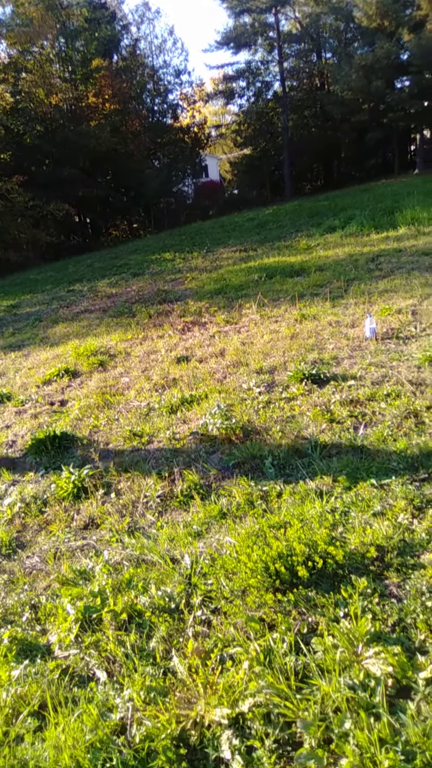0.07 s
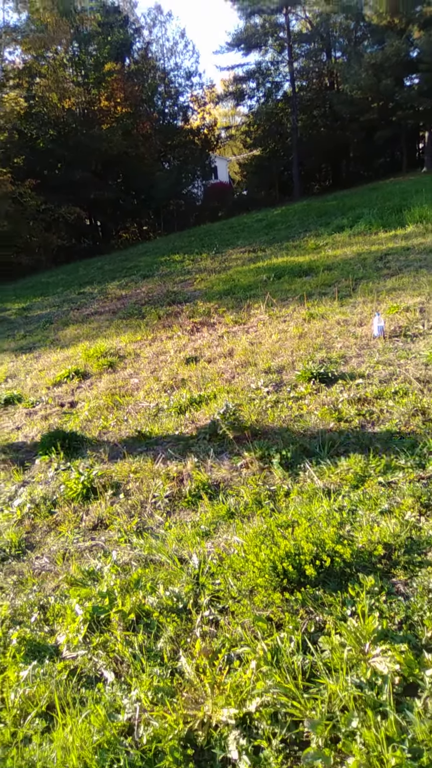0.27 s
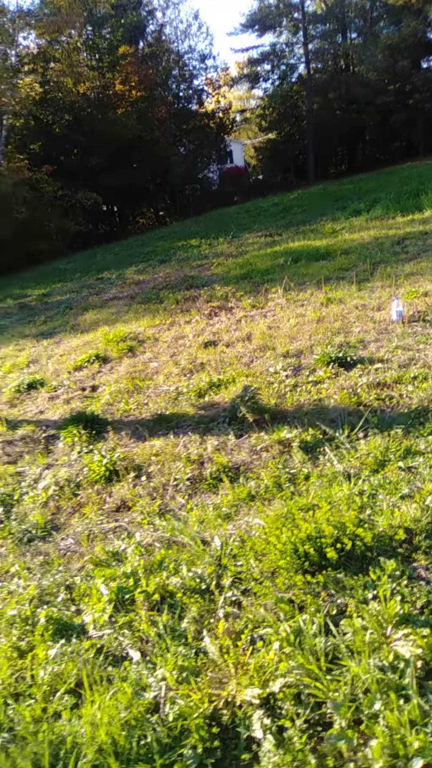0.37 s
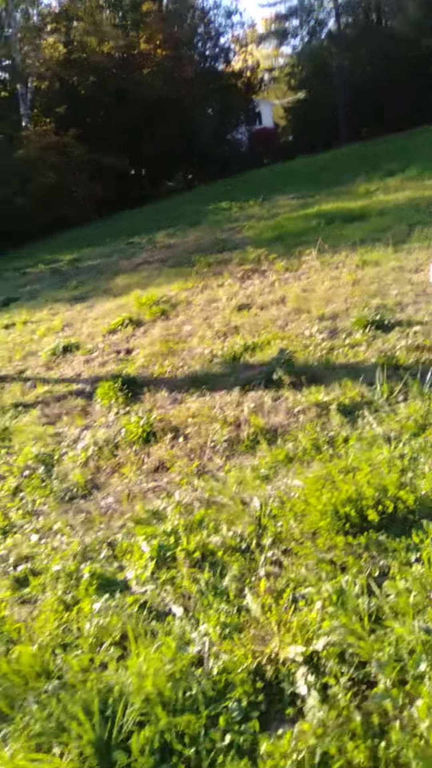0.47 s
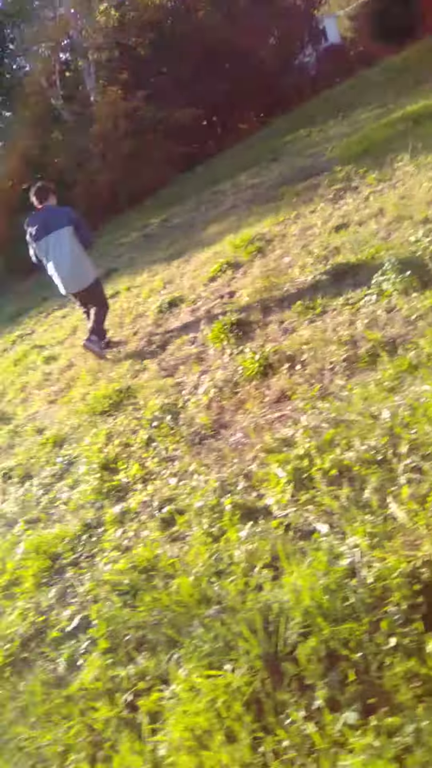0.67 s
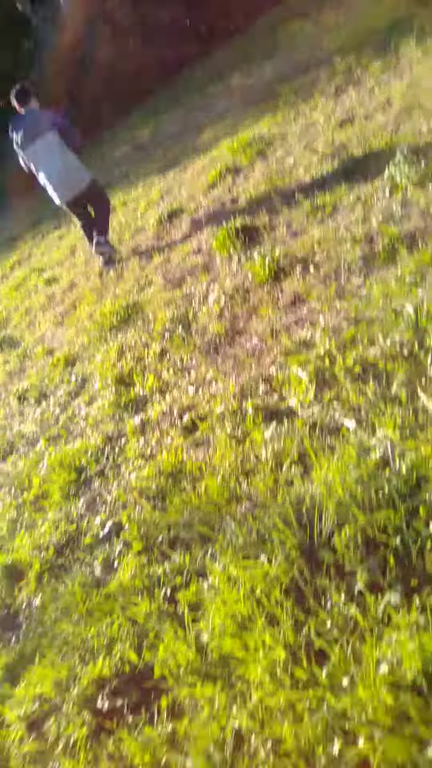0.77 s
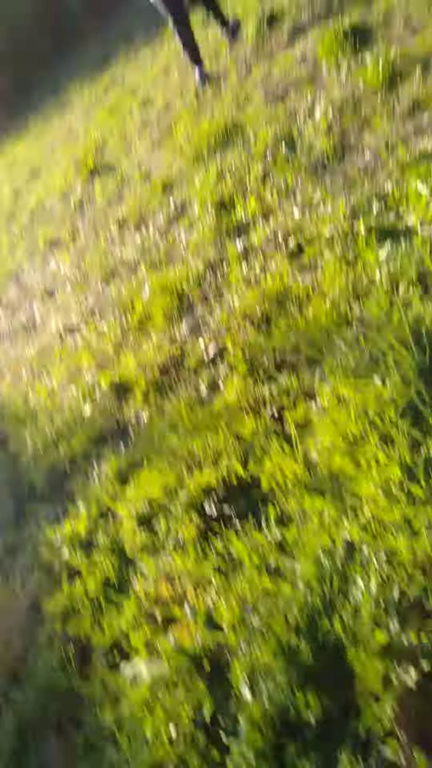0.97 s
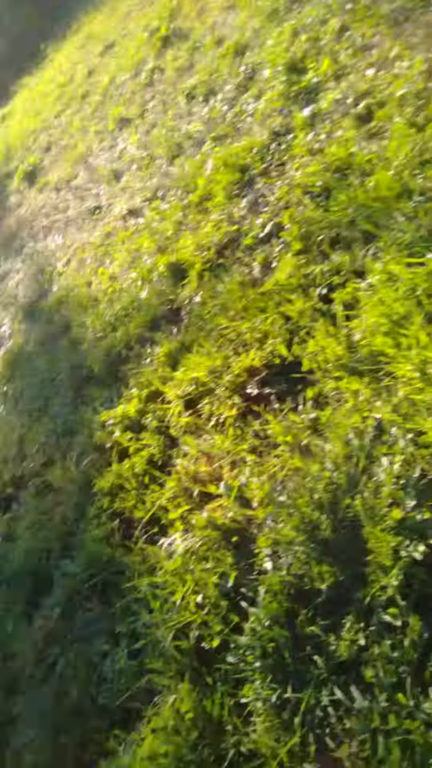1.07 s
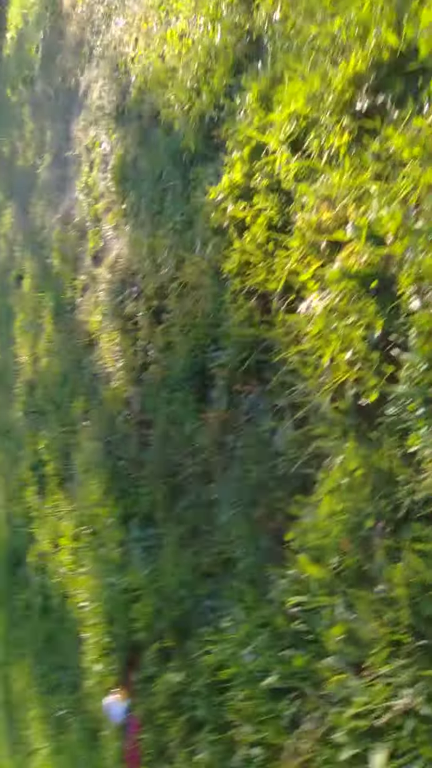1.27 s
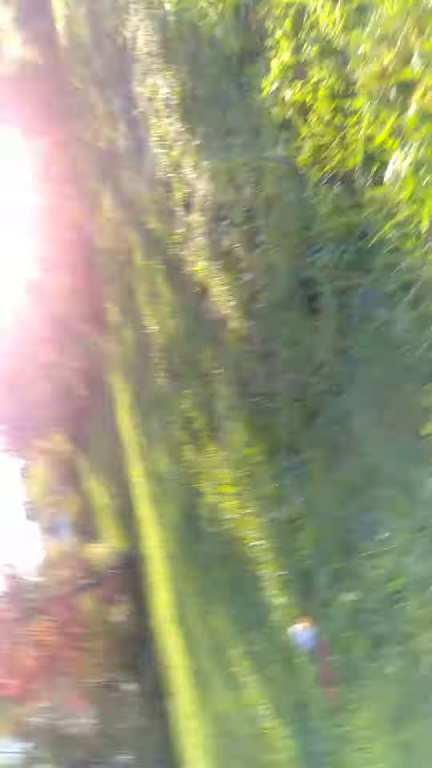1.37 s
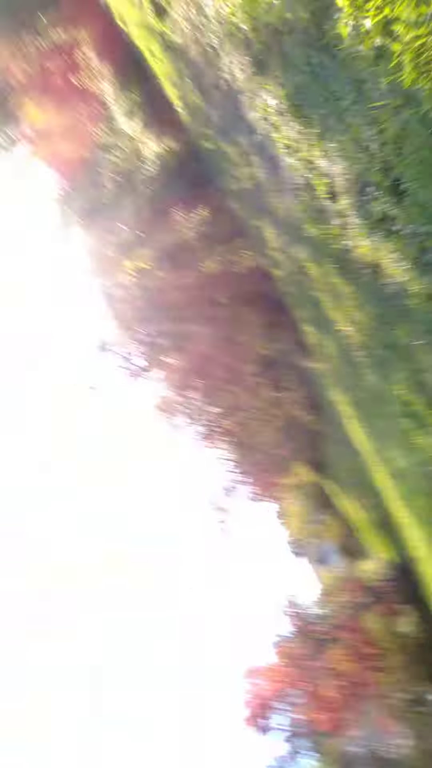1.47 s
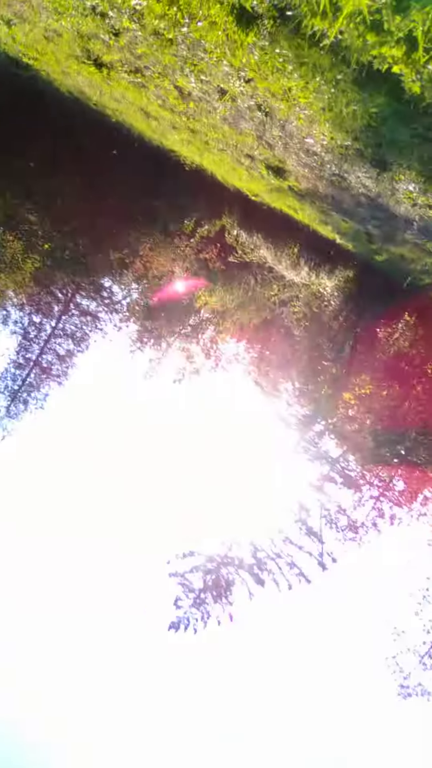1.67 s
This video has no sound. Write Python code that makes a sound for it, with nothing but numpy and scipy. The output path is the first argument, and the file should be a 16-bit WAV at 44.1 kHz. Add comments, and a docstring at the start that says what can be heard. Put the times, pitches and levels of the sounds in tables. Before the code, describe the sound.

A loud, blunt knock hits the camera's microphone with a sharp click of distortion, just after a tap and a rub. The casing vibrates briefly, leaving faint outdoor hiss, tiny handling ticks and a puff of air.

```python
"""On a lawn, a hand-held camera is bumped: a dull tap, a short scrape, then two blunt thumps that overload
the microphone, with a sharp, high click of distortion. The casing shudders briefly. As the camera swings
round, air buffets the microphone, and small ticks of friction from the shifting grip stand out of a faint
high hiss and a distant outdoor murmur."""
import sys
import numpy as np
from scipy import signal
from scipy.fft import rfft, irfft
from scipy.io import wavfile

SR = 44100
rng = np.random.default_rng(int(sys.argv[2]) if len(sys.argv) > 2 else 0)


def transcribe(u):
    """Save the signal u as a 16-bit wav file named by the first command-line argument.

    u: samples, shape (n,) or (channels, n), limited to [-1, 1]; the rate is SR.
    q: integer samples, one column per channel.
    """
    v = np.clip(np.atleast_2d(u).T, -1, 1)
    q = np.round(v * 32767).astype(np.int16)
    wavfile.write(sys.argv[1], SR, q)


N = 74970
T = np.arange(N) / SR
FREQS = np.fft.rfftfreq(N, 1 / SR)


def amp(db):
    """Decibels to gain."""
    return 10 ** (np.asarray(db) / 20)


def unit(x):
    """Scales to rms 1."""
    return x / np.sqrt(np.mean(x ** 2) + 1e-20)


def since(s):
    """Time elapsed after s, zero before."""
    return np.maximum(T - s, 0)


def level(curve):
    """A fader ride through (t/s, level/dB) points."""
    return amp(np.interp(T, *np.transpose(curve)))


def coloured(x, colour):
    """Equalises x through (f/Hz, level/dB) points, then scales to rms 1."""
    hz, db = np.transpose(colour)
    return unit(irfft(rfft(x) * amp(np.interp(np.log(FREQS + 1), np.log(hz), db)), N))


def noise(colour):
    """Steady noise of a given colour."""
    return coloured(rng.standard_normal(N), colour)


def grains(per_s, spread_db):
    """Random clicks of uneven size, rms 1."""
    size = amp(spread_db * np.minimum(rng.exponential(1, N), 4))
    return unit(size * rng.choice([-1, 1], N) * (rng.random(N) < per_s / SR))


def wander(rate_hz):
    """Random drift around a given rate, rms 1."""
    return unit(irfft(rfft(rng.standard_normal(N)) * (FREQS / rate_hz) * np.exp(-FREQS / rate_hz), N))


def air():
    """Air on the microphone: a low rumble, and lopsided buffets a few cycles long."""
    # rumble fader: t/s, level/dB
    rumble_ride = [(0, -58), (.04, -47), (.06, -60), (.22, -51), (.25, -25.5), (.3, -29.5), (.37, -17.5),
                   (.41, -40.5), (.58, -55), (.68, -56), (.74, -63.5), (1.37, -60.5), (1.395, -37),
                   (1.46, -35), (1.5, -35.5), (1.57, -33), (1.62, -52), (1.7, -62)]
    # bass-heavy EQ: f/Hz, level/dB
    rumble_eq = [(20, -4.5), (60, 3), (110, 3.5), (200, -10.5), (330, -16.5), (600, -34), (1200, -39),
                 (2500, -57.5), (6000, -82.5)]
    # single buffets: t/s, level/dB, f/Hz, half length/s
    buffets = [(.012, -40, 89, 0.0061), (.04, -39, 84, 0.009), (0.68, -58.5, 301, 0.021),
               (.912, -38, 75, 0.0056), (0.919, -45, 189.4, 0.0059), (.988, -36, 84, 0.0092),
               (1.394, -32, 113, 0.0056), (1.413, -25, 206, 0.0048), (1.427, -22.5, 135, 0.004),
               (1.455, -32.5, 101, 0.005), (1.489, -35.5, 137, 0.0039), (1.53, -14.5, 166, 0.0047),
               (1.54, -15.5, 70, 0.0089), (1.569, -30.5, 88, 0.0077)]
    skew = 0.59
    out = noise(rumble_eq) * level(rumble_ride)
    for s, db, hz, half in buffets:
        phase = 2 * np.pi * hz * (T - s)
        out += amp(db) * np.exp(-((T - s) / half) ** 2) * np.cos(phase + skew * np.sin(phase))
    return out


def outdoors():
    """The bed: a grainy high hiss that flutters band by band, over a distant murmur."""
    # hiss fader: t/s, level/dB
    hiss_ride = [(0, -88), (.22, -87), (.25, -69), (.29, -66), (.37, -52), (.45, -49), (.62, -52.5),
                 (.85, -54.5), (.88, -59), (1.02, -61.5), (1.06, -57), (1.25, -61), (1.39, -74),
                 (1.44, -47.5), (1.55, -69), (1.58, -66.5), (1.615, -54.5), (1.7, -61.5)]
    # bright EQ: f/Hz, level/dB
    hiss_eq = [(1500, -25), (3000, -24), (4800, -23.5), (6200, -3.5), (8000, -1), (10000, -9), (12000, -10),
               (15000, -8.5), (16500, -13.5)]
    # murmur fader: t/s, level/dB
    murmur_ride = [(0, -89), (.22, -91), (.45, -67.5), (.8, -64), (1.1, -63), (1.5, -63), (1.7, -63)]
    # dark EQ: f/Hz, level/dB
    murmur_eq = [(100, 2), (300, -1.5), (550, -9), (830, 7), (1150, -7.5), (1600, -11), (2500, -27),
                 (5000, -30), (16000, -38)]
    flutter_db, flutter_hz, band_width_hz = 1.64, 14, 2400
    spectrum = rfft(coloured(rng.standard_normal(N) + .5 * grains(per_s=1500, spread_db=4), hiss_eq))
    band = FREQS // band_width_hz
    hiss = sum(irfft(spectrum * (band == k), N) * amp(flutter_db * wander(flutter_hz))
               for k in np.unique(band))
    return hiss * level(hiss_ride) + noise(murmur_eq) * level(murmur_ride)


def tap():
    """The first touch: a sharp push, the struck spot's hollow note, then the casing's dull ring."""
    # casing modes: f/Hz, level/dB, t60/s
    modes = [(92, -8, 0.045), (162, -21, 0.069), (264, -23.5, 0.021)]
    tap_s, rise_s, ring_s = .23688, .00046, .2385
    hollow_hz, hollow_decay_s = 850, .0011
    rise = since(tap_s) / rise_s
    push = amp(2) * (rise * np.exp(1 - rise)) ** 2
    after_peak = since(tap_s) - rise_s
    attack = np.sin(np.pi / 2 * np.minimum(rise, 1)) ** 2
    envelope = attack * np.exp(-after_peak / hollow_decay_s)
    hollow = amp(-4) * envelope * np.cos(2 * np.pi * hollow_hz * after_peak)
    t = since(ring_s)
    ring = sum(amp(db - 60 * t / t60) * np.sin(2 * np.pi * hz * t) for hz, db, t60 in modes)
    return ring - push - hollow


def scrape():
    """The hand's dull rubbing turns into gritty friction on the casing, with a few small bumps."""
    # rub fader: t/s, level/dB
    rub_ride = [(.232, -100), (.241, -31.5), (.256, -44.5), (.266, -37.5), (.3, -42), (.32, -36),
                (.37, -40.5), (.4, -55.5), (.47, -65), (.55, -94)]
    # muffled EQ: f/Hz, level/dB
    rub_eq = [(60, -12), (200, 0), (500, -4), (900, -12), (1500, -21.5), (2500, -32.5), (5000, -50)]
    # grit fader: t/s, level/dB
    grit_ride = [(.24, -85.5), (.28, -60.5), (.31, -50.5), (.316, -36), (.324, -38.5), (.332, -21.5),
                 (.335, -57.5), (.343, -54.5), (.35, -18), (.358, -24.5), (.371, -32.5), (.378, -53),
                 (.4, -56), (.42, -51.5), (.47, -62), (.55, -91)]
    # broad EQ: f/Hz, level/dB
    grit_eq = [(100, -3.5), (500, 1), (1200, -1.5), (3000, -6), (6500, -9.5), (10000, -18), (16000, -18.5)]
    # bumps of the hand: t/s, level/dB, decay/s
    hand_bumps = [(.2963, -29.5, 0.00022), (0.307, -20, 0.00034), (.315, -16.5, 0.00086),
                  (0.3735, -14.5, 0.00033), (0.3766, -11.5, 0.00069)]
    grit = coloured(grains(per_s=3000, spread_db=3.5) + 0.72 * rng.standard_normal(N), grit_eq)
    bumps = sum(amp(db) * since(s) / decay * np.exp(1 - since(s) / decay) for s, db, decay in hand_bumps)
    return noise(rub_eq) * level(rub_ride) + grit * level(grit_ride) - bumps


def thumps():
    """Two blunt pressure thumps that overload the microphone, each swelling and then flipping abruptly."""
    # pressure thumps: flip t/s, swell level/dB, build-up/s, tail level/dB, tail f/Hz, decay/s
    cues = [(.3332, 5, 0.0024, 1.5, 3.9, 0.037), (.3468, -1.5, .0008, 14, 60, 0.0033)]
    out = np.zeros(N)
    for k, (s, swell_db, build, tail_db, hz, decay) in enumerate(cues):
        t = since(s)
        swell = -amp(swell_db) * np.exp(np.minimum(T - s, 0) / build)
        tail = amp(tail_db) * np.exp(-t / decay) * np.cos(2 * np.pi * hz * t)
        out += (-1) ** k * np.where(T < s, swell, tail)  # the second has opposite polarity
    return out


def distortion_click():
    """A sharp, high click of distortion from the overloaded microphone."""
    start_s, click_hz, decay_s = .3444, 9800, .00014
    t = since(start_s)
    return -amp(1) * np.exp(-t / decay_s) * np.sin(2 * np.pi * click_hz * t)


def shudder():
    """The casing vibrates after the thumps: a low, nearly pure tone that swells, sags and dies."""
    # shudder fader: t/s, level/dB
    ride = [(.36, -110), (.39, -42), (.425, -36), (.455, -28), (.5, -33), (.55, -36), (.585, -52),
            (.62, -110)]
    # harmonics: multiple of the pitch, relative level/dB
    harmonics = [(1, -0.5), (2, -20.5), (3, -27), (4, -35), (5, -32)]
    pitch_hz, sag_hz_per_s, start_s = 104, 25, ride[0][0]
    turns = np.cumsum(pitch_hz - sag_hz_per_s * since(start_s)) / SR
    return level(ride) * sum(amp(db) * np.sin(2 * np.pi * k * turns) for k, db in harmonics)


def ticks():
    """Tiny bright bursts of friction as the grip shifts."""
    # handling ticks and swishes: t/s, level/dB, decay/s, centre f/Hz, width/octaves
    cues = [(.389, -44, .002, 12000, .5), (0.416, -46, 0.0048, 1800, 0.64),
            (.45, -40.5, 0.0018, 8400, 0.84), (.528, -48.5, 0.0076, 8200, 0.27),
            (.625, -47, 0.0052, 10000, .5), (.91, -52, 0.0053, 2600, .3), (.9268, -28, 0.00074, 9000, .48),
            (1.0, -48, 0.0076, 12800, 0.46), (1.1378, -38, 0.0021, 9020, 0.78),
            (1.144, -33.5, 0.0024, 8150, 0.64), (1.15, -58.5, 0.076, 6300, 0.32),
            (1.295, -49, 0.0038, 11000, 0.78), (1.428, -38.5, .002, 7360, 0.28),
            (1.435, -34.5, 0.0024, 10000, 0.78), (1.4366, -32.5, 0.0017, 9900, 0.8),
            (1.447, -39, 0.0037, 11000, 0.87), (1.453, -27, 0.001, 9900, 0.82),
            (1.457, -33, 0.0024, 7200, 0.19), (1.608, -55.5, 0.073, 6900, .17)]
    out = np.zeros(N)
    for s, db, decay, hz, octaves in cues:
        band = np.exp(-.5 * abs(np.log2((FREQS + 1) / hz) / octaves) ** 3)
        fade = (T >= s) * np.exp(-since(s) / decay)
        burst = irfft(rfft(rng.standard_normal(N) * fade) * band, N)
        out += amp(db) * unit(burst) * np.sqrt(np.mean(fade ** 2))
    return out


def scene():
    """The bump, the moving camera and the outdoor bed, mixed to mono."""
    bump = tap() + scrape() + thumps() + distortion_click() + shudder()
    return (bump + air() + ticks() + outdoors())[None]


def record(dry):
    """The microphone overloads into hard clipping; a steep low-pass trims the very top."""
    ceiling, cutoff_hz = .99, 15950
    clipped = np.clip(dry, -ceiling, ceiling)
    low_pass = signal.firwin(255, cutoff_hz, window=("kaiser", 9), fs=SR)
    return signal.oaconvolve(clipped, low_pass[None], "same")


dry = scene()
out = record(dry)
transcribe(out)
```